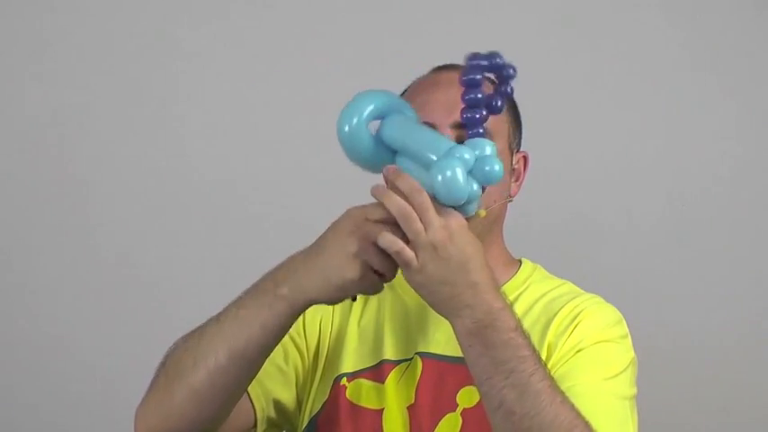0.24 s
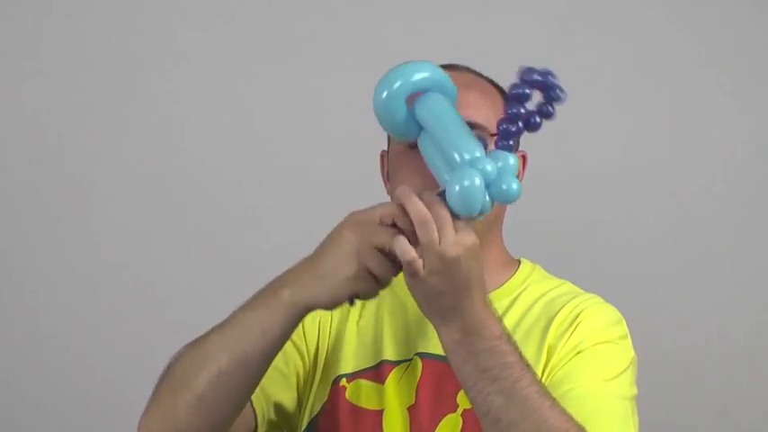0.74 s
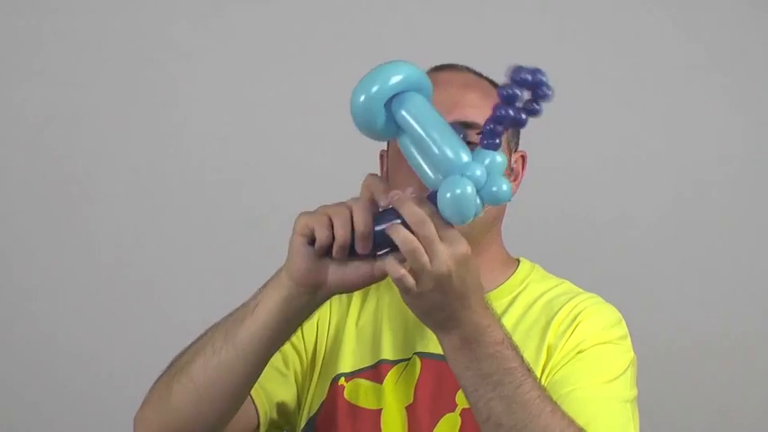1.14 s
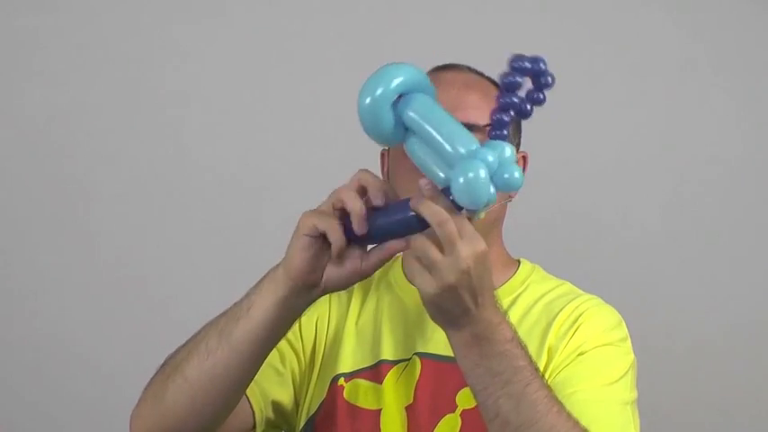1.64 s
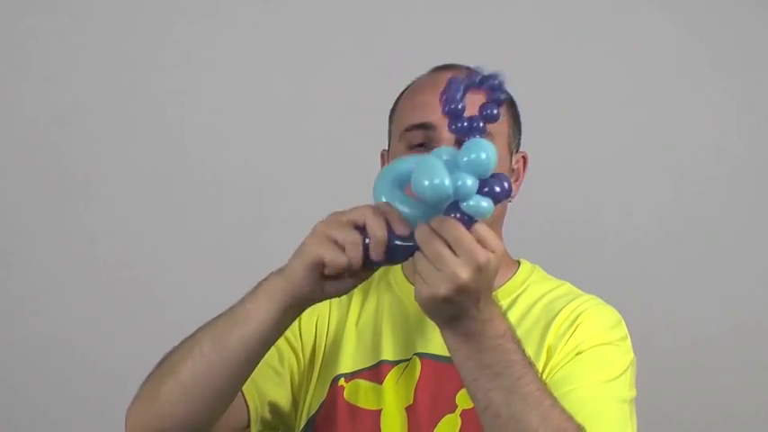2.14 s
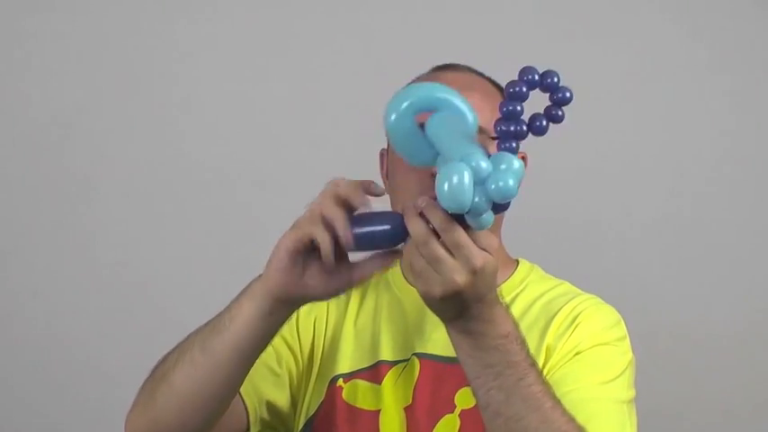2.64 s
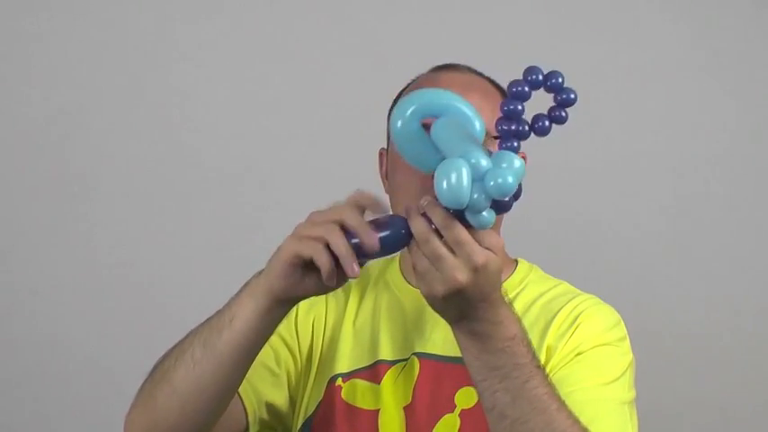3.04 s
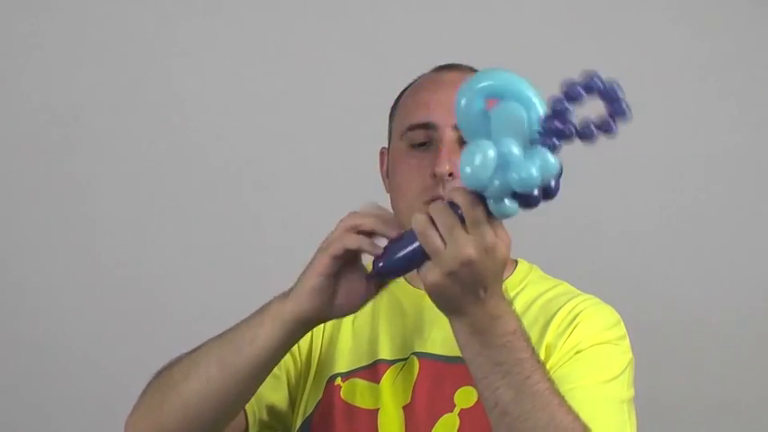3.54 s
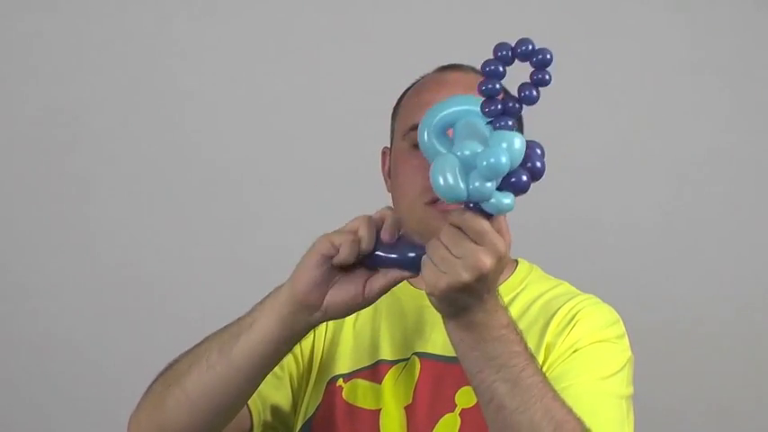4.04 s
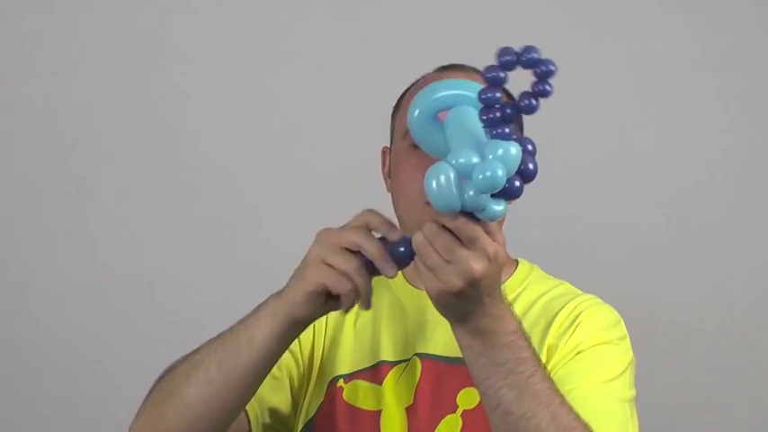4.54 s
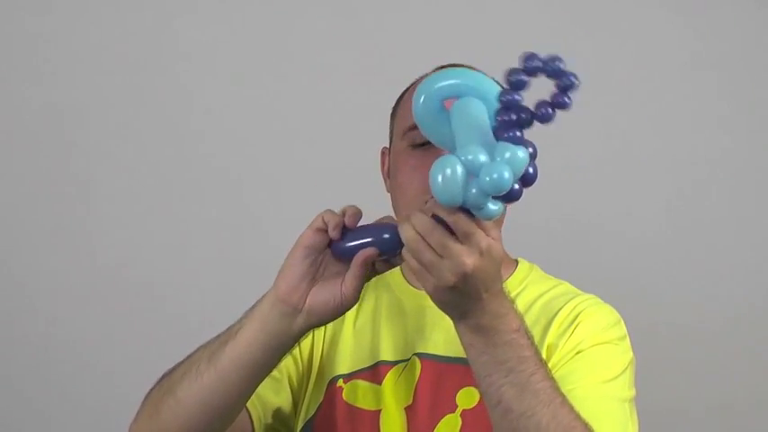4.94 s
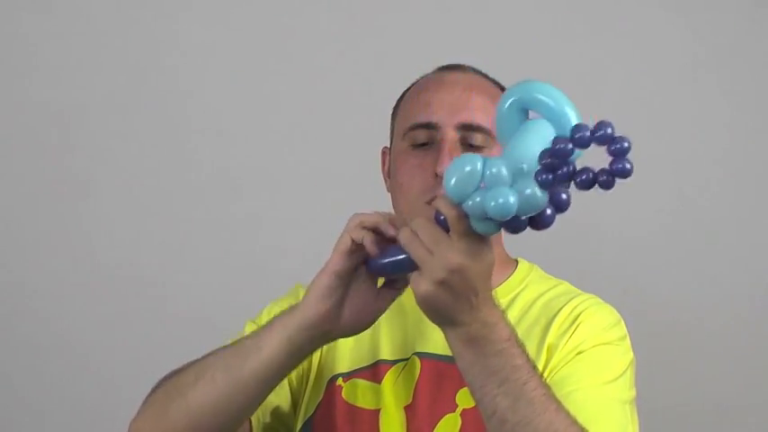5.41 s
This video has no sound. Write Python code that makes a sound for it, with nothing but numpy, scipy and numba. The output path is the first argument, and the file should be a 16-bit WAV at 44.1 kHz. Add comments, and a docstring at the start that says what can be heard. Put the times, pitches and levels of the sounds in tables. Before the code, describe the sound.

A latex balloon is twisted close to the microphone in a small, quiet room with faint steady air noise and short dull reflections. A faint creak starts it, then squeals and rough rubbing crowd 0.12-0.5 s, including a high chirp near 0.27; a loud burst of snaps cracks at 0.52-0.56. After a tiny gap, grainy creaking runs from 0.65 to 1.17 s. Quieter, hollower squeaks and rubs follow from 1.2, with a soft thump at 1.34. Around 1.95-2.2 a low rustle brushes the hands, then snaps pepper 2.2-2.33 amid dense rubbing until 2.68. A bright squeak at 2.9 leads to stronger low thumps at 3.02 and 3.15, and a falling squeal at 3.25. Stuttering creaks continue in short strokes, some slow and ratchety, with a thump and very high chirp near 4.65, a sharp crack cluster at 4.82, a rising squeak at 5.12, and rough rubbing and snaps to the end.

```python
"""Hands twist a long latex balloon into small bubbles, close by in a small room with faint air noise.
Creaks and squeals crowd the first half second, then snaps crack; rubbing goes on with short gaps to the end.
From 1.3 s low thumps join in as fingers let go; near 2 s the figure brushes the hands and rustles.
Slow uneven stick-slip creaks, fast even slips lock into squeals, lone slips snap.
Pulses at the slips ring resonances of the skin, the air inside and the contact edge; thumps ring low modes."""
import sys
import numpy as np
from scipy import signal
from scipy.fft import rfft, irfft
from scipy.io import wavfile
from scipy.ndimage import uniform_filter1d
from numba import njit

SR = 44100
rng = np.random.default_rng(int(sys.argv[2]) if len(sys.argv) > 2 else 0)


def file_out(sig):
    """Save sig as 16-bit WAV at sys.argv[1]."""
    # one column per channel
    cols = np.atleast_2d(sig).T
    # limit, then scale
    lim = np.clip(cols, -1, 1)
    pcm = np.round(lim * 32767).astype(np.int16)
    wavfile.write(sys.argv[1], SR, pcm)


N = 250047
TIME_S = np.arange(N) / SR

# resonances of the hollow bubble, the contact edge and its fizz: (centre [Hz], width [Hz], gain [dB])
BODY_MODES = [(520, 340, -7), (1150, 1060, -11)]
EDGE_MODES = [(3195, 820, -3.5), (4180, 1580, -7.5), (5730, 1090, -12)]
FIZZ_MODES = [(10380, 4300, -3), (13270, 4700, -0.6), (14620, 930, 1.2)]


def rubbing(colour_db=4.0, skin_width_hz=680, overtone_ratio=1.63, overtone_width_hz=700, overtone_db=-8,
            air_width_hz=300, scuff_db=-8, body_db=1.0, clump_db=2.12):
    """The slip train drives the skin, the air inside and the bright edge of the contact."""
    rate_hz, roughness, level_db, hollow_db, bright_db, ring_hz, air_hz, fizz_db = contact()
    times_s, sizes, slip_roughness = slips(rate_hz, roughness)
    friction = from_db(scuff_db) * scuff(clicks(times_s, sizes * slip_roughness), decay_s=0.00058)

    # a rough slip lands on a new spot each time, so it feeds each resonance differently
    chance = rng.standard_normal((N // 10, 3))[:len(times_s)].T
    shares = from_db(colour_db * slip_roughness * chance)
    skin_drive, air_drive, edge_drive = [clicks(times_s, sizes * share) + friction for share in shares]
    skin_drive = scatter(skin_drive, roughness, decay_s=0.0059, scatter_db=6.0)
    edge_drive = scatter(edge_drive, roughness, decay_s=0.0028, scatter_db=12.0)

    skin = moving_ring(skin_drive, ring_hz, skin_width_hz)
    skin -= from_db(overtone_db) * moving_ring(skin_drive, ring_hz * overtone_ratio, overtone_width_hz)
    skin = even(cut(cut(skin, 516, "high"), 2340, "low"))

    body = moving_ring(air_drive, air_hz, air_width_hz) + ring(air_drive, BODY_MODES)
    body = even(cut(cut(body, 212, "high"), 1170, "low", order=4))

    edge = even(cut(cut(ring(edge_drive, EDGE_MODES), 3700, "high"), 7000, "low", order=4))
    spray = edge_drive + roughness * scuff(edge_drive, decay_s=0.000057)
    spray = even(cut(ring(spray, FIZZ_MODES), 6600, "high"))

    # a locked squeal trades fizz for clear overtones
    lock = np.clip(1 - roughness / 0.21, 0, 1)
    fizz_db = fizz_db - 7 * lock
    bright_db = bright_db + 4 * lock ** 2
    top = (edge + from_db(fizz_db) * spray) / np.hypot(1, from_db(fizz_db))

    # the grip comes and goes in small clumps
    level_db = level_db + clump_db * roughness * drift(92)
    return from_db(level_db) * (skin + from_db(hollow_db + body_db) * body + from_db(bright_db) * top)


# squeals; dB columns are bases for the swell, catches and lock: (start [s], end [s], first rate [Hz],
# middle rate [Hz], last rate [Hz], roughness [0-1], skin level [dB], hollow body [dB re skin], bright edge [dB re skin])
SQUEAL_ROWS = [(0.045, 0.085, 582, 593, 574, 0.28, -38, -1.5, -9),
               (0.125, 0.199, 597.5, 560.5, 522.2, 0.42, -22.5, -9.5, -6),
               (0.236, 0.263, 391, 414, 520, 0.58, -26.5, -4, 2),
               (0.267, 0.307, 1518, 1645, 1565, 0.11, -20.5, -32, -6),
               (0.341, 0.394, 648.7, 667, 682.6, 0.2, -21, -17.5, -7.5),
               (0.403, 0.464, 585, 653, 661.5, .19, -19.5, -29, -11.5),
               (1.121, 1.163, 561.4, 532.2, 504.5, .22, -21, -19, -6),
               (1.214, 1.237, 762, 831, 882.4, 0.54, -27, -7.5, -8.5),
               (1.371, 1.387, 846, 872, 906.4, 0.15, -27.5, -1.5, -9),
               (1.446, 1.473, 755, 617.6, 539.6, 0.36, -34, 1.5, -5.5),
               (1.58, 1.648, 576, 622.7, 688, 0.35, -22.5, -6, -6),
               (1.652, 1.662, 956.7, 1057, 1076, 0.11, -23, 1.5, -2),
               (1.702, 1.718, 633.8, 608.4, 589.6, 0.59, -29, -3.5, -3.5),
               (1.766, 1.824, 449.7, 369.3, 375.5, 0.34, -25.5, -3.5, 0),
               (1.872, 1.918, 428.7, 385, 411.5, 0.51, -25, -3, -2.5),
               (2.032, 2.072, 491.5, 514, 541.2, 0.22, -28, 5, -4),
               (2.823, 2.835, 725.2, 786, 860.4, 0.52, -23.5, -3.5, -7.5),
               (2.905, 2.919, 921, 941.6, 1006, .36, -18.5, -12, -8),
               (2.925, 2.958, 1241, 1349, 1228, 0.19, -21, -7, -5.5),
               (3.003, 3.009, 912, 820, 778.4, 0.4, -23.5, -1.5, -18),
               (3.152, 3.17, 606.5, 590, 559, 0.42, -21.5, -11.5, -5.5),
               (3.234, 3.305, 490.7, 400, 336.2, 0.29, -23.5, -6.5, -7.5),
               (3.56, 3.598, 765.4, 786, 728, 0.52, -27, -5, -3),
               (3.661, 3.668, 558, 588, 600, .18, -22.5, -5.5, -4),
               (4.468, 4.487, 496.6, 472, 429.9, 0.09, -26.5, 5, -3),
               (4.651, 4.661, 1745, 1946, 2096, 0.3, -16.5, -43, -12.5),
               (4.679, 4.687, 992, 1052, 1021, 0.36, -18.5, -30, -8.5),
               (5.115, 5.147, 449, 561, 739.7, .25, -22, -12, -8),
               (5.237, 5.249, 730.4, 768.6, 780.4, 0.22, -28, -7.5, -5),
               (5.291, 5.378, 696.6, 688.6, 696.8, 0.62, -25.5, -7, 0),
               (5.609, 5.648, 811.5, 812.5, 723, 0.17, -25, -8.5, -9)]
SQUEAL_SWELL_DB, SQUEAL_FADE_DB, SQUEAL_RELEASE_DB_PER_S = 0.5, 2, 1000
AIR_HZ, AIR_TOP_HZ = 670, 1090   # air ring at rest; a squeal pulls it to its own pitch, up to the top


def contact():
    """In a squeal the contact locks to a faster, more even cycle, until that sinks under the rubbing."""
    rate_hz, rough, level_db, hollow_db, bright_db, ring_hz, fizz_db = strokes()
    air_hz = np.full(N, float(AIR_HZ))
    for start_s, end_s, first_hz, middle_hz, last_hz, roughness, db, hollow, bright in SQUEAL_ROWS:
        progress = np.clip((TIME_S - start_s) / (end_s - start_s), 0, 1)
        squeal_db = db + SQUEAL_SWELL_DB * arch(progress) - SQUEAL_FADE_DB * (progress - .5)
        squeal_db -= SQUEAL_RELEASE_DB_PER_S * np.maximum(TIME_S - end_s, 0)
        locked = (TIME_S >= start_s) & ((TIME_S < end_s) | (squeal_db > level_db))
        pitch_curve = np.polyfit([0, .5, 1], [first_hz, middle_hz, last_hz], 2)
        rate_hz[locked] = np.polyval(pitch_curve, progress[locked])
        level_db[locked], rough[locked] = squeal_db[locked], roughness
        hollow_db[locked], bright_db[locked] = hollow, bright
        air_hz[locked] = np.minimum(rate_hz[locked], AIR_TOP_HZ)
    level_db = level_db + rough * catches()
    controls = np.array([rate_hz, rough, level_db, hollow_db, bright_db, ring_hz, air_hz, fizz_db])
    return uniform_filter1d(controls, size=SR // 600, axis=1)


# strokes of rubber on rubber; rate, roughness and ring are mid-stroke, dB columns are bases:
# (start [s], end [s], first level [dB], last level [dB], slip rate [Hz], roughness [0-1], skin ring [Hz],
# hollow body [dB re skin], bright edge [dB re skin], fizz [dB re edge])
RUB_ROWS = [(0.0, 0.109, -38, -39, 510, 0.95, 1840, -7.5, -4.5, -6),
            (0.122, 0.32, -23.5, -25.5, 495, 0.81, 1770, -20, -5, -6.5),
            (0.338, 0.502, -22, -20, 650, .4, 1850, -21, -6, -3.5),
            (0.508, 0.548, -23, -28, 242, .9, 2200, -12, -4, -2.5),
            (0.646, 0.983, -26.5, -25, 366, 0.59, 1950, -13.5, -7, -3),
            (0.991, 1.04, -25, -25, 155, 0.24, 2150, -20, -3, -10),
            (1.046, 1.166, -22, -26, 468, 0.47, 2095, -23, -5.5, -11),
            (1.299, 1.349, -36.5, -33, 400, 0.76, 1515, -5, -3, -5),
            (1.42, 1.48, -35.5, -40, 614, 0.61, 1770, -6, -4.5, -4),
            (1.498, 1.669, -27.5, -32.5, 564, 0.71, 1770, -4, -4, -5.5),
            (1.749, 1.944, -36.5, -29, 400, 0.71, 1826, -3, -2, -3.5),
            (1.961, 2.161, -33, -33.5, 450, 0.8, 1602, -11.5, -1.5, -3.5),
            (2.17, 2.319, -26.5, -27, 300, .95, 2049, -13, -6, -3),
            (2.341, 2.481, -26, -23.5, 493, 0.6, 1906, -11, -6.5, -1.5),
            (2.488, 2.676, -25.5, -29, 543, 0.58, 1700, -4.5, -5.5, -3),
            (2.796, 2.847, -40, -30, 624, 0.87, 1889, -8, -2.5, -6),
            (2.901, 2.974, -19, -26, 670, 0.71, 1995, -15, -8, -8),
            (3.175, 3.324, -26, -28.5, 270, 0.42, 1795, -6, -0.5, -6),
            (3.348, 3.38, -26, -27, 137, 0.21, 1950, -9.5, -7.5, -5),
            (3.438, 3.533, -24, -27, 590, 0.51, 2148, -7.5, -2, -6),
            (3.599, 3.688, -34.5, -33, 570, 0.58, 2129, -16, -1, -3),
            (3.705, 3.842, -35, -33, 119, 0.36, 1999, -15, -1.5, -5),
            (3.855, 4.025, -25, -25, 310, .45, 1860, -11.5, -7, -4.5),
            (4.03, 4.191, -26, -27, 288, 0.48, 2310, -13.5, -3.5, -3.5),
            (4.208, 4.405, -31, -27, 390, 0.69, 1795, -6.5, -3.5, -4),
            (4.449, 4.55, -30, -44, 356, 0.5, 1349, 0, -2.5, -4.5),
            (4.607, 4.647, -34.5, -34, 530, 0.64, 1980, -10.5, -5.5, -7),
            (4.719, 4.747, -23.5, -25, 525, 0.68, 2198, -13.5, -5.5, -7),
            (4.761, 4.892, -35, -37.5, 396, 0.94, 2024, -8, -6.5, -5),
            (4.905, 5.121, -26.5, -21.5, 330, 0.44, 1810, -9.5, -6.5, -6.5),
            (5.309, 5.434, -23.5, -28, 353, 0.98, 1753, -9, -6, -7),
            (5.463, 5.509, -39, -32.5, 313, 0.93, 1750, 0.5, -6, -5),
            (5.555, 5.671, -33.5, -24.5, 284, 0.97, 1742, -8, -4, -6)]
BITE_DB_PER_S, RELEASE_DB_PER_S, SWELL_DB = 1400, 499.5, 0.5
RESTING_DB = -50.5   # the fingers never quite hold still
SLOWING, SETTLING, RING_SAG = .25, .3, 0.049   # slip rate, roughness, ring pitch lost [share of mid-stroke]


def strokes():
    """As the twist tightens the slips slow down and even out; the strongest stroke holds the contact."""
    controls, strongest_db = np.zeros((7, N)), np.full(N, -np.inf)
    for start_s, end_s, first_db, last_db, rate_hz, rough, ring_hz, hollow_db, bright_db, fizz_db in RUB_ROWS:
        progress = np.clip((TIME_S - start_s) / (end_s - start_s), 0, 1)
        level_db = first_db + (last_db - first_db) * progress + SWELL_DB * arch(progress)
        level_db -= BITE_DB_PER_S * np.maximum(start_s - TIME_S, 0)
        level_db -= RELEASE_DB_PER_S * np.maximum(TIME_S - end_s, 0)
        holds = level_db > strongest_db
        strongest_db = np.maximum(strongest_db, level_db)
        twist = progress[holds] - .5
        controls[:, holds] = np.broadcast_arrays(
            rate_hz * (1 - SLOWING * twist), rough * (1 - SETTLING * twist),
            np.maximum(level_db[holds], RESTING_DB), hollow_db, bright_db,
            ring_hz * (1 - RING_SAG * twist), fizz_db)
    return controls


CATCHES_PER_S, CATCH_DB, CATCH_DECAY_S = 30, 7, 0.0079


def catches():
    """The grip catches at random: the level jumps, then eases, in dB around zero."""
    starts = rng.random(N) < CATCHES_PER_S / SR
    jumps_db = signal.lfilter([CATCH_DB], [1, -np.exp(-1 / (CATCH_DECAY_S * SR))], starts)
    return np.minimum(jumps_db, 2 * CATCH_DB) - jumps_db.mean()


def slips(rate_hz, rough, wander=.11, jitter_cycles=0.2276, uneven_db=3.0):
    """Times, sizes and roughness of the slips; slow ones store more strain."""
    # under light roughness the cycle locks and hardly wavers
    rough = np.clip(rough, 0, 1) * np.clip(rough / .2, 0, 1)
    cycles = np.cumsum(rate_hz * np.exp(wander * rough * drift(70))) / SR
    times_s = np.interp(np.arange(1, int(cycles[-1])), cycles, TIME_S)
    rate_hz, rough = np.interp(times_s, TIME_S, rate_hz), np.interp(times_s, TIME_S, rough)
    late, size = rng.standard_normal((N // 10, 2))[:len(times_s)].T
    sizes = from_db(uneven_db * rough * size) / np.sqrt(rate_hz)
    return times_s + jitter_cycles * rough * late / rate_hz, sizes, rough


def scuff(pulses, decay_s):
    """Each slip drags a brief burst of friction noise with the energy of the slip."""
    r = np.exp(-1 / (decay_s * SR))
    power = signal.lfilter([1 - r], [1, -r], pulses ** 2 + 1e-18)
    return np.sqrt(power) * rng.standard_normal(N)


def scatter(x, rough, decay_s, scatter_db, change_hz=14, path_count=4):
    """Waves run round the bubble and return by changing paths, most of all in rough rubbing."""
    age_s, echoes = TIME_S[:SR // 60], 0
    for _ in range(path_count):
        path = rng.standard_normal(len(age_s)) * np.exp(-age_s / decay_s)
        path /= np.sqrt(path_count * np.sum(path ** 2))
        echoes = echoes + drift(change_hz) * signal.oaconvolve(x, path)[:N]
    return x + from_db(scatter_db) * np.sqrt(np.abs(rough)) * echoes


def moving_ring(x, hz, width_hz):
    """The bubble rings at a pitch that follows its control curve."""
    return glide(x, 2 * np.pi * hz / SR, np.exp(-np.pi * width_hz / SR))


# single hard slips: (time [s], peak level before the low cut [dB], skin ring [Hz])
SNAP_ROWS = [(0.5159, -2.5, 2270), (0.5298, -10, 2760), (0.5395, -13, 2715), (0.5574, -6.5, 2779),
             (2.1964, -12, 1934), (2.241, -13, 2050), (2.2602, -6, 2271), (2.2853, -12, 1930),
             (2.326, -7, 1823), (2.7113, -8, 1495), (3.0253, -10.5, 1703), (3.1904, -10, 2136),
             (3.3582, -9.5, 1949), (4.428, -19.5, 1702), (4.8124, -7.5, 1419), (4.8164, -5.5, 2955),
             (4.8207, -15, 1438), (4.9041, -11.5, 1526), (5.2606, -13.5, 2560), (5.292, -12, 1786),
             (5.5032, -7.5, 2518), (5.5834, -11.5, 2094)]


def snaps(width_hz=520, edge_db=-6, fizz_db=-19, scuff_db=-17):
    """A lone slip of a tight twist cracks and rings the skin for a few milliseconds."""
    out, size = np.zeros(N + SR), SR // 20
    age_s = TIME_S[:size]
    for time_s, peak_db, hz in SNAP_ROWS:
        grit = rng.standard_normal(size) * np.exp(-age_s / 0.0011)
        kick = (age_s == 0) + from_db(scuff_db) * grit
        crack = resonate(kick, hz, width_hz)
        crack += from_db(edge_db) * ring(kick, EDGE_MODES) + from_db(fizz_db) * ring(kick, FIZZ_MODES)
        start = int(time_s * SR)
        out[start:start + size] += from_db(peak_db) * crack / np.abs(crack).max()
    return cut(out[:N], 400, "high")


# fingers letting go: (time [s], level [dB])
THUMP_ROWS = [(1.344, -29.5), (2.754, -29.5), (3.024, -18), (3.151, -21), (4.426, -28), (4.631, -22),
              (5.494, -29.5)]
# resonances of a thump: (centre [Hz], width [Hz], relative gain [dB])
THUMP_RESONANCES = [(150, 120, 1), (400, 100, 9.5), (520, 80, 13), (820, 330, -6.5)]


def thumps():
    """A finger lets go: a soft push on the air inside the balloon rings its low modes."""
    time_s, peak_db = np.transpose(THUMP_ROWS)
    boom = cut(ring(signal.unit_impulse(SR // 4), THUMP_RESONANCES), 1160, "low")
    return signal.fftconvolve(clicks(time_s, from_db(peak_db)), boom / np.abs(boom).max())[:N]


# the swaying figure brushes the hands: (time [s], rustle level added [dB])
BRUSH_ROWS = [(1.95, -36), (2.17, -40.5)]
BRUSH_FADE_DB_PER_S, HANDS_DB = 160, -62


def handling():
    """The moving hands add a low rustle that swells at each brush."""
    sway = from_db(HANDS_DB)
    for time_s, db in BRUSH_ROWS:
        sway = sway + from_db(db - BRUSH_FADE_DB_PER_S * np.abs(TIME_S - time_s))
    rustle = cut(cut(rng.standard_normal(N), 380, "low"), 47, "high")
    return sway * from_db(2 * drift(2.5)) * rustle / rustle.std()


ROOM_T60_S, ROOM_DB, WALL_CUT_HZ = 0.43, -15, 5000


def room(x, first_echo_s=0.0035):
    """Dense dull reflections from near walls: decaying low-passed noise as the response."""
    age_s = TIME_S[:SR // 2]
    tail = rng.standard_normal(len(age_s)) * from_db(-60 * age_s / ROOM_T60_S) * (age_s > first_echo_s)
    tail = cut(tail, WALL_CUT_HZ, "low", order=1)
    tail *= np.sqrt(WALL_CUT_HZ * np.pi / SR / np.sum(tail ** 2))
    return from_db(ROOM_DB) * signal.fftconvolve(x, tail)[:N]


# spectrum of the quiet room: (frequency [Hz], relative spectral level [dB])
FLOOR_SPECTRUM = [(25, 6), (70, -5.5), (400, -9), (1000, -8.5), (16000, -28.5)]
FLOOR_RMS_DB = -47.5


def floor():
    """Steady air noise of the room: white noise shaped in the spectrum."""
    hz, db = np.transpose(FLOOR_SPECTRUM)
    bins_hz = np.arange(N // 2 + 1) * SR / N + 1   # +1 avoids log of zero
    gain = from_db(np.interp(np.log(bins_hz), np.log(hz), db))
    air = cut(irfft(rfft(rng.standard_normal(N)) * gain, N), 16.0, "high")
    return from_db(FLOOR_RMS_DB) * air / air.std()


def from_db(db):
    """Decibels to gain."""
    return 10 ** (np.asarray(db) / 20)


def arch(progress):
    """A swell over progress 0-1, with height 1 and mean 0."""
    return 4 * progress * (1 - progress) - 2 / 3


def drift(rate_hz):
    """Slow chance with spread 1."""
    slow = cut(rng.standard_normal(N + SR), rate_hz, "low")[SR:]
    return slow / slow.std()


def clicks(times_s, sizes):
    """Impulses placed between samples."""
    at = np.clip(np.asarray(times_s) * SR, 0, N - 2)
    whole, part = at.astype(int), at % 1
    return np.bincount(whole, sizes * (1 - part), N) + np.bincount(whole + 1, sizes * part, N)


def even(x, window_s=0.0085):
    """Hold the short-term rms near 1 and keep the single pulses."""
    size = int(window_s * SR)
    power = uniform_filter1d(uniform_filter1d(x * x, size), size)
    return x / np.sqrt(np.abs(power) + 1e-4 * np.mean(x * x))


def cut(x, hz, kind, order=2):
    """Butterworth low- or high-pass."""
    sos = signal.butter(order, min(hz, .45 * SR), kind, fs=SR, output="sos")
    return signal.sosfilt(sos, x + 1e-18)


def resonate(x, hz, width_hz):
    """One resonance with gain 1 on top."""
    r = np.exp(-np.pi * width_hz / SR)
    feedback = [1, -2 * r * np.cos(2 * np.pi * hz / SR), r * r]
    return signal.lfilter(np.array([1, 0, -1]) * (1 - r * r) / 2, feedback, x + 1e-18)


def ring(x, modes):
    """Resonances side by side, with alternating sign."""
    return sum((-1) ** k * from_db(db) * resonate(x, hz, width_hz)
               for k, (hz, width_hz, db) in enumerate(modes))


@njit
def glide(x, angle, r):
    """A resonance whose centre moves."""
    y = np.zeros(len(x))
    for i in range(2, len(x)):
        drive = (1 - r * r) / 2 * (x[i] - x[i - 2])
        y[i] = drive + 2 * r * np.cos(angle[i]) * y[i - 1] - r * r * y[i - 2] + 1e-18
    return y


def scene():
    """The balloon in its room."""
    balloon = rubbing() + snaps() + thumps() + handling()
    return (balloon + room(balloon) + floor())[None]


CUTOFF_HZ = 16300


def record(dry, top=1.0):
    """Peaks are rounded and the treble above the cutoff is removed."""
    sos = signal.ellip(10, .1, 80, CUTOFF_HZ, fs=SR, output="sos")
    return signal.sosfilt(sos, top * np.tanh(dry / top))


dry = scene()
out = record(dry)
file_out(out)
```